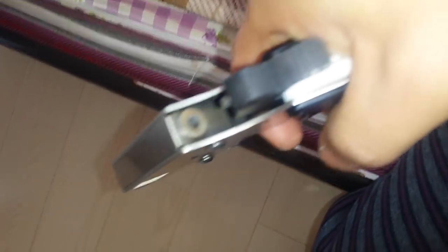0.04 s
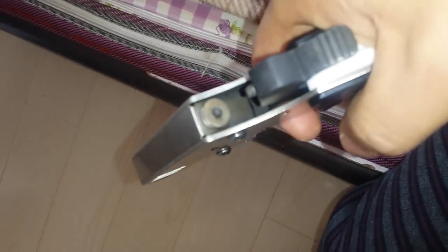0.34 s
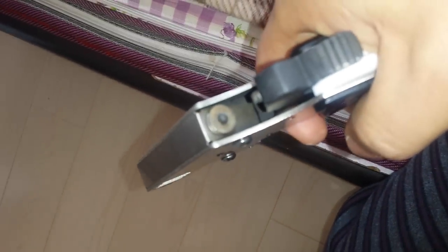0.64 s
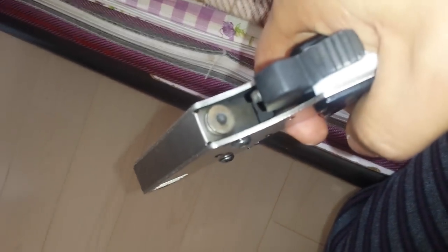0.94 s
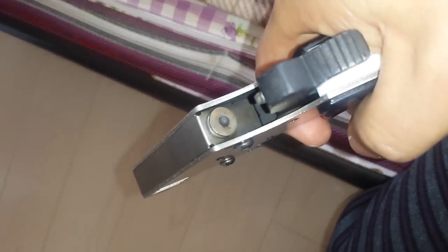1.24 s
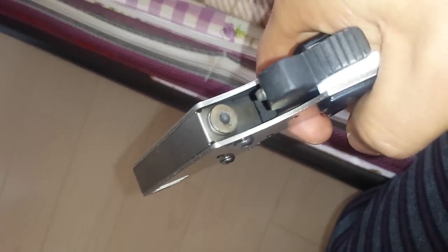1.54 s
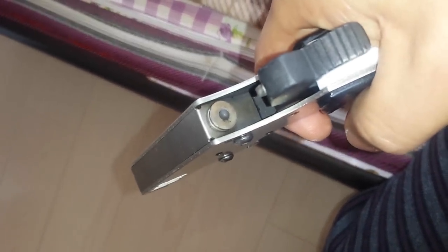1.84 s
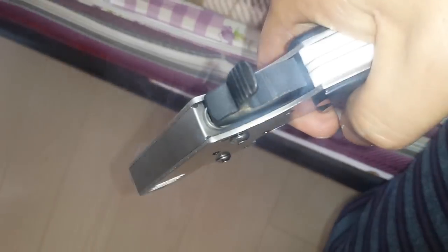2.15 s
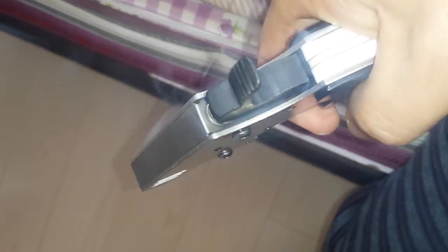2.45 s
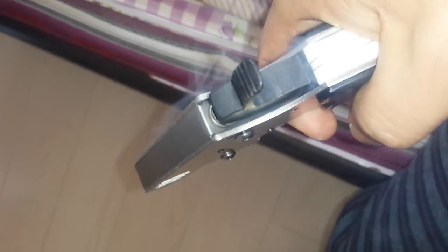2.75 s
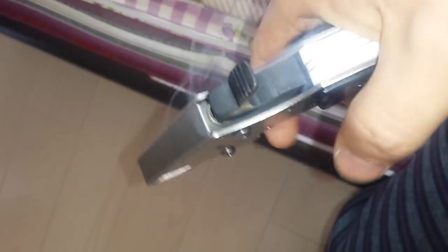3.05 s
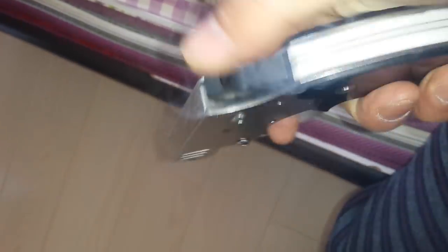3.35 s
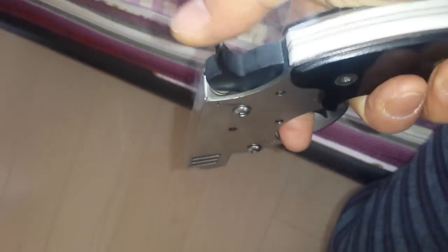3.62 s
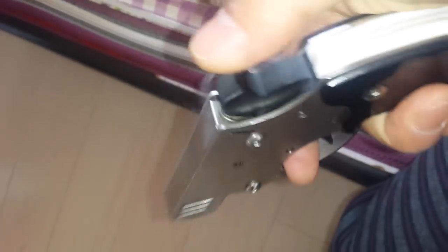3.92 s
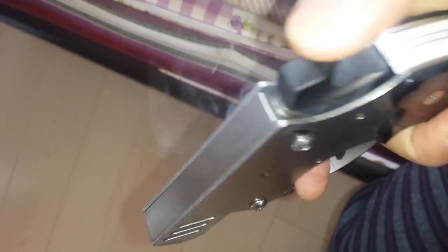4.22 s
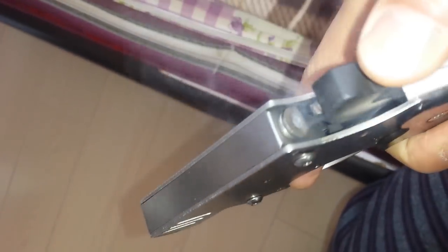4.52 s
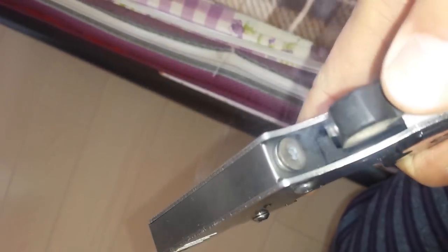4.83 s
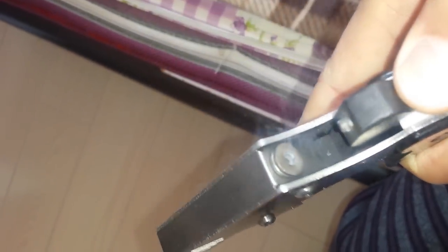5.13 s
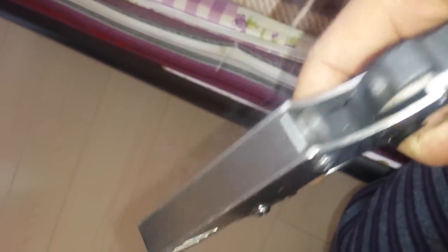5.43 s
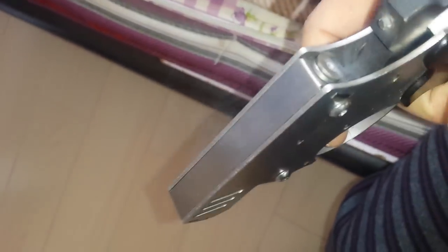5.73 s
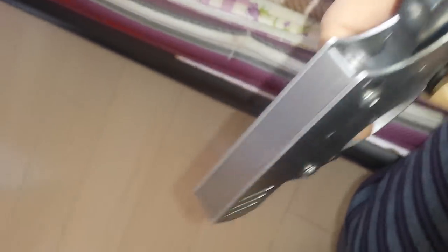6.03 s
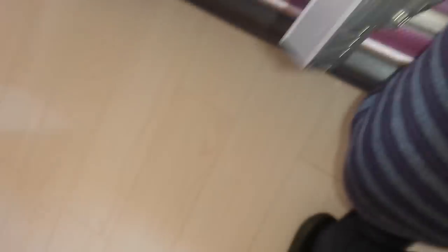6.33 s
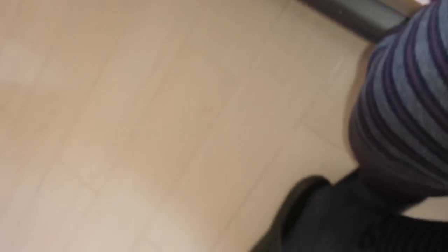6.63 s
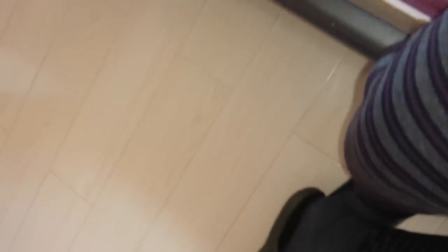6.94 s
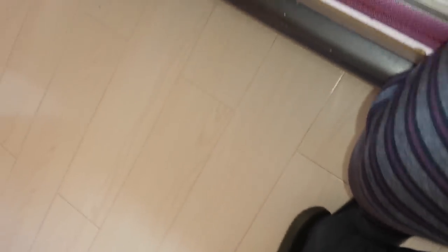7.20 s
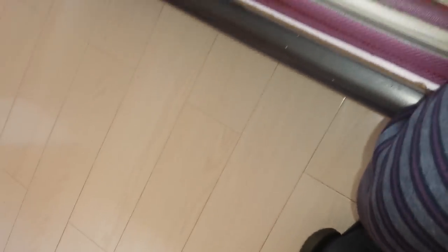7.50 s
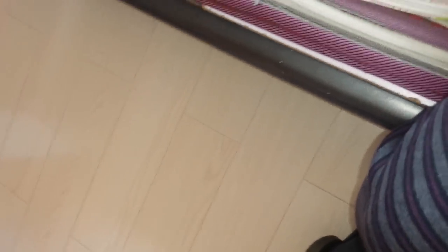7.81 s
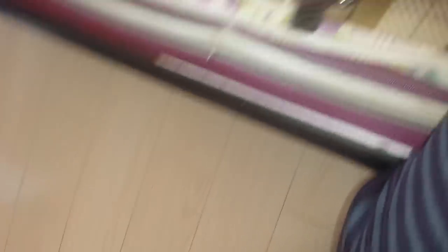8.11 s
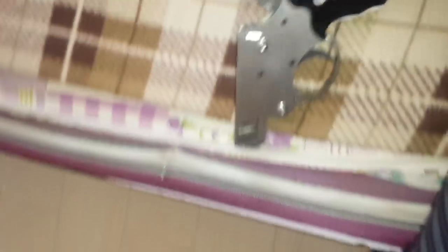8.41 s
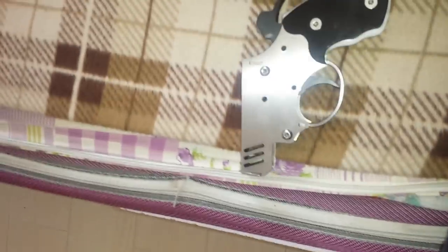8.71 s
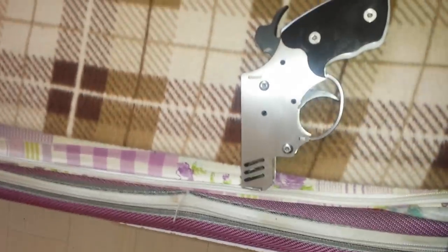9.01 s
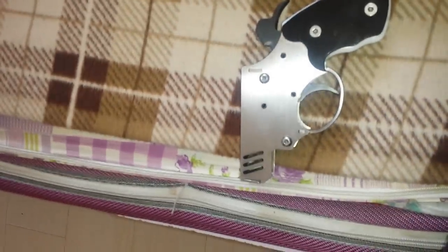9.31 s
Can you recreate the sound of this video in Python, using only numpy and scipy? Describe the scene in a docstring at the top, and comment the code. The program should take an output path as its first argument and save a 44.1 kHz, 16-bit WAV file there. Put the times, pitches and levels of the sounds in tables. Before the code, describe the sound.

A quiet furnished room carries a faint appliance hum and soft fan air, with small ticks and creaks from fingers gripping the hand-held microphone. A slightly clearer click comes at about 1.8 seconds. At 2 seconds a small steel match pistol fires very close: one loud, sharp bang that overloads the microphone, with a brief low thump and a room echo gone in about half a second. The background dips, then creeps back. Light taps and finger slips on steel follow between 3 and 5 seconds. At about 5.1 seconds the hammer is cocked with a bright metallic snap and a short, thin ring, weaker than the shot, and the background dips again. From 6 seconds until the end, a little after 9, sleeve and blanket rustle very faintly among scattered soft grip ticks and knocks.

```python
"""A quiet furnished room: faint appliance hum and fan air, with grip ticks on a hand-held phone.
At 2.0 s a small steel match pistol fires close by; its gas jet bangs and overloads the microphone.
At 5.1 s the hammer is cocked with a snap that rings the frame. Gain control ducks the background
after both loud sounds. From about 6 s, sleeve and blanket rustle between further grip ticks."""
import sys
import numpy as np
from scipy import signal
from scipy.fft import rfft, irfft
from scipy.io import wavfile
from scipy.ndimage import uniform_filter1d, minimum_filter1d

SR = 44100
rng = np.random.default_rng(int(sys.argv[2]) if len(sys.argv) > 2 else 0)


def materialize(psi):
    """Save the field psi as 16-bit PCM at rate SR to the path in sys.argv[1].

    A 1-D psi becomes a single channel; in a 2-D psi each row is a channel.
    """
    bounded = np.clip(np.atleast_2d(psi).T, -1, 1)
    quanta = np.round(bounded * 32767).astype(np.int16)
    wavfile.write(sys.argv[1], SR, quanta)


N = 412776
T = np.arange(N) / SR

# powder blast spectrum: freq_hz, gain_db
BLAST_SPECTRUM = [(60, -35), (170, -22), (400, -14.5), (750, -11.5), (1200, -5.5), (1650, -5.5), (2350, 1),
                  (3400, -6), (5500, -1.7), (7800, -3.5), (10000, -8), (12000, -14), (14500, -19.5)]
# low overload rumble: freq_hz, gain_db
OVERLOAD_RUMBLE_SPECTRUM = [(25, -5), (60, -2), (150, -0.5), (320, 1.5), (500, -3), (1000, -6),
                            (2000, -15.5), (4000, -36)]
# hand-damped steel frame: freq_hz, level_db, t60_s
FRAME_MODES = [(1360, -22, 0.018), (2400, -10, 0.018), (3640, -4, 0.025), (4420, -13, 0.017),
               (5480, -6, 0.014), (5790, -5.5, 0.013), (7360, -8.5, .009), (7226, -1, 0.015),
               (8410, 0.5, 0.012), (9830, -19, 0.0092), (11960, -15, .005), (14200, -37, .004),
               (3540, -28, 0.56), (3639, -49, .42), (4360, -39, 0.66), (4580, -32, 0.42), (5001, -46, 0.48),
               (5200, -51, 0.72)]
# frame's radiation to the walls: freq_hz, gain_db
FRAME_RADIATION = [(900, -47), (1350, -18.5), (1950, -25), (2400, -11.5), (2900, -17.5), (3600, 1),
                   (4050, -5), (4450, -4), (5100, -9.5), (6400, -10.5), (7600, -2), (10000, -8.5),
                   (12000, -12), (14000, -16)]
# grip creaks knocking through the phone's case: start_s, peak_db, centre_hz
GRIP_KNOCKS = [(.063, -30.5, 1700), (.428, -37, 1400), (1.8131, -23.5, 2770), (3.571, -35.5, 1900),
               (3.6495, -40, 332), (4.4443, -38.5, 1550), (5.333, -36, 1350), (6.2682, -37.5, 1450),
               (6.3968, -42, 1400), (6.4186, -41.5, 800), (6.875, -39.5, 950), (7.6136, -42.5, 1300),
               (9.1881, -48, 1400)]
# dry ticks by the right port: start_s
GRIP_TICKS = [0.3713, 1.651, 1.794, 3.715, 4.2114, 4.8517, 5.4915, 5.6346, 6.771, 7.5546, 8.6915]
# fingers slipping on steel: start_s, peak_db, centre_hz
FINGER_SLIPS = [(.201, -43.5, 7500), (.6687, -46, 6500), (3.0402, -40, 5500), (3.6492, -34, 7650),
                (4.7706, -49, 5150), (6.878, -42, 7700), (6.9145, -42, 7400), (7.1612, -42, 6200)]
# hollow taps: start_s, peak_db, pan_db
HOLLOW_TAPS = [(3.039, -38, -1.5), (8.597, -49, 12)]
# phone case resonances: freq_hz, gain_db
CASE_RESPONSE = [(150, 15), (500, 6), (900, 1), (1300, 6), (1900, 2), (2900, 1), (4000, -4.5), (7000, -3)]
# sleeve and blanket strokes: middle_s, half_width_s, level_db, centre_hz
CLOTH_STROKES = [(6.269, .13, -64, 5900), (6.432, .029, -62, 7900), (6.623, .045, -64, 6500),
                 (6.621, 0.053, -60, 1750), (7.099, 0.2, -66.5, 6800), (7.174, 0.059, -61.5, 220),
                 (8.317, 0.073, -67.5, 7500), (8.532, .28, -68.5, 4860), (8.962, 0.06, -66, 181)]
# mains and fan motor: pitch_hz, level_db, pan_db
HUM_LINES = [(120, -69.5, 3), (218.7, -70.5, 2.5), (259, -72, -0.5), (299.8, -64.5, 4.5),
             (553.3, -81.5, -1.5), (708, -81, 0.5), (838, -81, 0), (916, -85.5, 0.5), (1220, -89, 0),
             (1352, -86, 1)]
# room air and microphone hiss: freq_hz, gain_db
AIR_SPECTRUM = [(20, -14), (35, -10.5), (60, -1), (110, -7), (240, -1), (450, -10), (740, -7.5),
                (1100, -13), (1700, -17.5), (2950, -20), (3500, -23), (5700, -22), (6250, -20), (6900, -23),
                (11600, -23.5), (12400, -17), (13200, -24)]
# room reverberation: freq_hz, t60_s
ROOM_DECAY = [(100, 0.3), (400, .43), (1100, .45), (2400, .44), (5500, .41), (8000, .36), (10500, .29),
              (14000, 0.23)]
# microphone ports: freq_hz, gain_db
PORT_RESPONSE = [(30, -6), (150, 0.5), (1000, -0.5), (2500, 1), (5500, 1.5), (8000, 1.5), (11000, 0.5),
                 (14500, -3.5)]


def shot(gain_db=42, jet_db=5, jet_t60_s=0.059, pan_db=1.5,
         rumble_db=-5.5, rumble_s=0.08, rumble_t60_s=0.99, front_db=13):
    """A gas jet bursts and fills the room; a low microphone overload rumble lasts about 80 ms."""
    t = T[:SR]
    jet = unit(rng.standard_normal((2, SR)) * fade(t, jet_t60_s))
    bang = unit(colour(amp(jet_db) * jet + room(), BLAST_SPECTRUM))
    bang *= np.hypot(1, amp(jet_db))  # energies of jet and room add
    rumble_noise = colour(rng.standard_normal((2, SR)), OVERLOAD_RUMBLE_SPECTRUM)
    envelope = fade(t, rumble_t60_s) + amp(front_db) * fade(t, jet_t60_s)
    rumble = unit(rumble_noise * envelope / (1 + (t / rumble_s) ** 20))
    return amp(gain_db) * (pan(pan_db) * bang + amp(rumble_db) * rumble)


def cocking(gain_db=16.5, room_db=-6, crack_db=-7.5, crack_t60_s=0.012, left_lag_s=0.00018):
    """The hammer drops into its notch: a crack, and a frame ring that reaches the right port first."""
    t = T[:SR]
    ring = sum(amp(db) * np.sin(2 * np.pi * hz * t) * fade(t, t60_s) * (-1) ** k
               for k, (hz, db, t60_s) in enumerate(FRAME_MODES))
    ring = band(ring, hz=5000, width_hz=18400, order=2)  # a small frame radiates no bass
    left_ring = np.interp(t - left_lag_s, t, ring, left=0)
    burst = rng.standard_normal((2, SR)) * fade(t, crack_t60_s)
    crack = band(burst, hz=6100, width_hz=11200, order=2)
    direct = unit(np.array([left_ring, ring])) + amp(crack_db) * unit(crack)
    echo = colour(room(early_db=-11, t60_scale=0.81), FRAME_RADIATION)
    return amp(gain_db) * (direct + amp(room_db) * unit(echo))


def grip_click(peak_db, hz, width_hz, t60_s, pan_db, rattle_db=-3, port_lag_s=0.0003):
    """A tiny slip: one impulse, later at the far port, and a short rattle through the case."""
    t = T[:SR // 8]
    rattle = unit(rng.standard_normal((2, len(t))) * fade(t, t60_s))
    push = amp(rattle_db) * rattle * np.sqrt(t60_s / 0.0064)  # energy grows with length
    near = int(pan_db < 0)
    push[near, 0] += 1
    push[1 - near, int(port_lag_s * SR)] += 1
    click = colour(band(push, hz, width_hz, order=2), CASE_RESPONSE)
    return amp(peak_db) * pan(pan_db) * click / np.abs(click).max()


def handling(knock_cycles=8.8, faint_knock_db=-48.5, faint_knock_hz=1400, tick_db=-43, faint_tick_db=-46):
    """Hands knock, tick, slip and tap on phone and pistol; fainter knocks and ticks fall at random."""
    out = np.zeros((2, N))
    faint_knocks = [(start_s, faint_knock_db, faint_knock_hz) for start_s in random_times(6)]
    for start_s, db, hz in GRIP_KNOCKS + faint_knocks:
        add(out, start_s, grip_click(db, hz, width_hz=2.3 * hz, t60_s=knock_cycles / hz, pan_db=10))
    for times_s, db in (GRIP_TICKS, tick_db), (random_times(6), faint_tick_db):
        for start_s in times_s:
            add(out, start_s, grip_click(db, hz=7000, width_hz=7300, t60_s=0.003, pan_db=-15.5))
    for start_s, db, hz in FINGER_SLIPS:
        add(out, start_s, grip_click(db, hz, width_hz=0.73 * hz, t60_s=0.04, pan_db=5.5))
    for start_s, db, pan_db in HOLLOW_TAPS:
        add(out, start_s, grip_click(db, hz=2020, width_hz=540, t60_s=0.049, pan_db=pan_db))
    return out


def cloth(grain_spread_db=4, catch_db=2, catch_rate_hz=90):
    """Fibres catch and slip in dense, uneven grains as the arm moves."""
    out = np.zeros((2, N))
    for middle_s, half_width_s, db, hz in CLOTH_STROKES:
        position = np.linspace(-2, 2, int(4 * half_width_s * SR))  # in half widths
        grains = rng.standard_normal((2, len(position)))
        grains *= amp(grain_spread_db * rng.standard_normal(len(position)))
        rustle = level(band(grains, hz, width_hz=0.9 * hz), db)
        add(out, middle_s - 2 * half_width_s, rustle * np.exp(-position ** 2))
    return out * amp(catch_db * drift(catch_rate_hz))


def hum(waver_db=1.3, drift_rad=0.15):
    """Mains and motor lines waver as the phone moves through the room's standing waves."""
    out = np.zeros((2, N))
    for hz, db, pan_db in HUM_LINES:
        amplitude = np.sqrt(2) * amp(db + waver_db * drift(rate_hz=3))
        phase_rad = 2 * np.pi * hz * T + drift_rad * drift(rate_hz=3.5)
        out += pan(pan_db) * amplitude * np.sin(phase_rad)
    return out


def air(level_db=-62.5, crossover_hz=650, swell_db=1.84, unshared_gain=0.65):
    """Fan air, partly alike at both ports in the bass, under each microphone's own hiss."""
    lowpass = signal.butter(2, crossover_hz, fs=SR, output="sos")
    highpass = signal.butter(2, crossover_hz, "high", fs=SR, output="sos")
    shared = signal.sosfilt(lowpass, rng.standard_normal(N))
    hiss = signal.sosfilt(highpass, rng.standard_normal((2, N)))
    draught = shared * amp(swell_db * drift(rate_hz=6)) + unshared_gain * rng.standard_normal((2, N))
    return level(colour(pan(db=2) * draught + pan(db=-3) * hiss, AIR_SPECTRUM), level_db)


def room(early_db=-7, ceiling_s=0.021, t60_scale=1):
    """Impulse response: weak echoes off the bedding, then the full tail once the ceiling answers."""
    t = T[:SR]
    spectrum = rfft(rng.standard_normal((2, SR)))
    centres_hz = np.geomspace(80, 16000, 14)
    tail = 0
    for hz, share in zip(centres_hz, np.eye(len(centres_hz))):
        weight = curve_at(np.c_[centres_hz, share], np.arange(spectrum.shape[1]))
        tail = tail + irfft(spectrum * weight) * fade(t, t60_scale * curve_at(ROOM_DECAY, hz))
    return unit(tail * np.where(t < ceiling_s, amp(early_db), 1) * (t > 0.003))


def gain_control(x, limit_db=0.36, range_db=9, hold_s=0.89, release_db_per_s=20):
    """Peaks over the limit pull the gain down at once; it holds, then creeps back."""
    peak_db = 20 * np.log10(np.abs(x).max(axis=0) + 1e-9)
    over_db = np.clip(peak_db - limit_db, 0, range_db)
    half_hold = int(hold_s * SR / 2)
    held_db = -minimum_filter1d(-over_db, 2 * half_hold + 1, origin=half_hold, mode="constant")
    cut_db = np.maximum.accumulate(held_db + release_db_per_s * T) - release_db_per_s * T
    return x * amp(-uniform_filter1d(cut_db, size=32))


def amp(db):
    """Decibels to gain."""
    return 10 ** (np.asarray(db) / 20)


def pan(db):
    """Stereo gains for a left-minus-right level."""
    return amp(np.array([[db], [-db]]) / 2)


def fade(t, t60_s):
    """Exponential decay, 60 dB down at t60_s."""
    return np.exp(-np.log(1000) * t / t60_s)


def unit(x):
    """Scale to unit mean energy per channel."""
    return x / np.sqrt(np.mean(np.sum(x ** 2, axis=-1)))


def level(x, db):
    """Scale to an rms level."""
    return x * amp(db) / np.sqrt(np.mean(x ** 2))


def curve_at(points, hz):
    """Interpolate freq_hz, value rows over log frequency."""
    freq_hz, value = np.transpose(points)
    return np.interp(np.log(np.maximum(hz, 1)), np.log(freq_hz), value)


def colour(x, points, size=4096):
    """Minimum-phase filter from freq_hz, gain_db rows."""
    gain = amp(curve_at(points, np.arange(size // 2 + 1) * SR / size))
    cepstrum = irfft(np.log(gain))
    cepstrum[1:size // 2] *= 2
    cepstrum[size // 2 + 1:] = 0
    impulse = irfft(np.exp(rfft(cepstrum)))
    return signal.oaconvolve(x, impulse[None], axes=-1)[:, :x.shape[-1]]


def band(x, hz, width_hz, order=1):
    """Band-pass about a geometric centre."""
    low_hz = np.hypot(hz, width_hz / 2) - width_hz / 2
    edges_hz = [low_hz, min(low_hz + width_hz, 0.47 * SR)]
    return signal.sosfilt(signal.butter(order, edges_hz, "band", fs=SR, output="sos"), x)


def drift(rate_hz):
    """Smooth random curve, spread near 1."""
    step = int(SR / rate_hz)
    knots = rng.standard_normal(N // step + 3)
    return uniform_filter1d(np.interp(T * rate_hz, np.arange(len(knots)), knots), step) * np.sqrt(2)


def random_times(count):
    """One random moment in each of count equal spans."""
    return (np.arange(count) + rng.random(count)) * T[-1] / count


def add(out, start_s, x):
    """Mix x in at start_s."""
    start = int(start_s * SR)
    out[:, start:start + x.shape[1]] += x[:, :N - start]


def scene(shot_s=2.0065, cocking_s=5.1371):
    """Shot, cocking and handling over air, hum and cloth."""
    out = air() + hum() + cloth()
    add(out, shot_s, shot())
    add(out, cocking_s, cocking())
    return out + handling()


def record(dry, overload_db=5, top_hz=14700):
    """Microphone overload, port smear and colour, gain control, full-scale clip, low-pass."""
    clipped = np.clip(dry, -amp(overload_db), amp(overload_db))
    smeared = clipped - 2 * band(clipped, hz=3000, width_hz=2100)  # all-pass: flat tops become peaks
    ducked = gain_control(colour(smeared, PORT_RESPONSE))
    lowpass = signal.ellip(8, 0.2, 70, top_hz, fs=SR, output="sos")
    return signal.sosfilt(lowpass, np.clip(ducked, -1, 1))


dry = scene()
out = record(dry)
materialize(out)
```